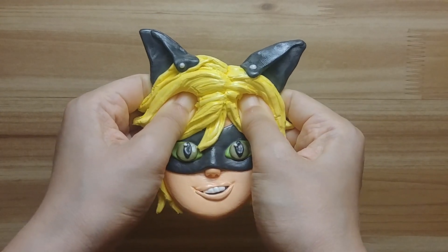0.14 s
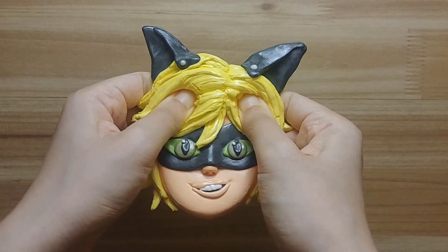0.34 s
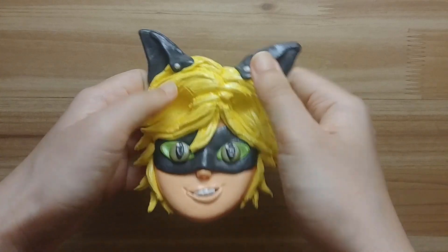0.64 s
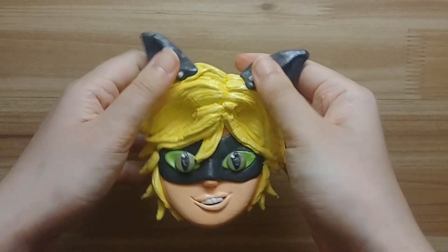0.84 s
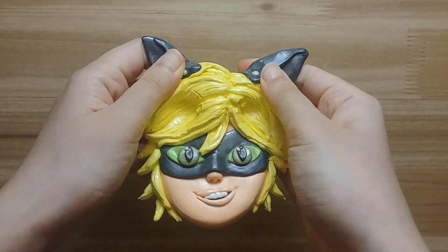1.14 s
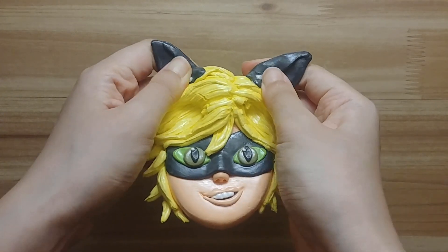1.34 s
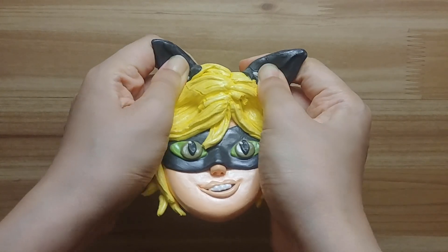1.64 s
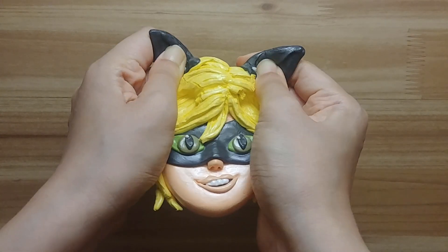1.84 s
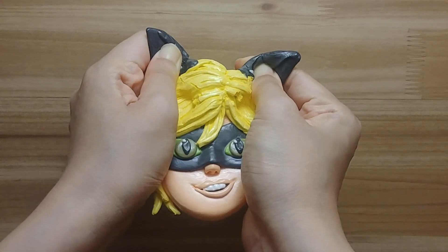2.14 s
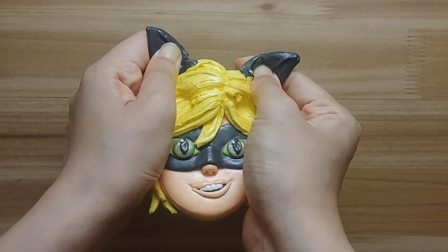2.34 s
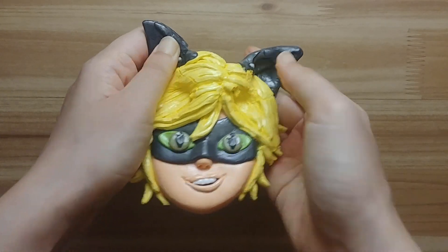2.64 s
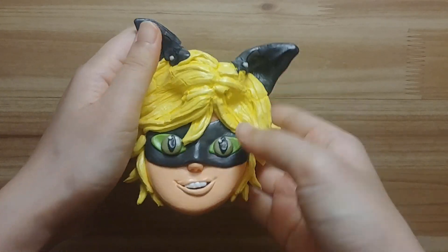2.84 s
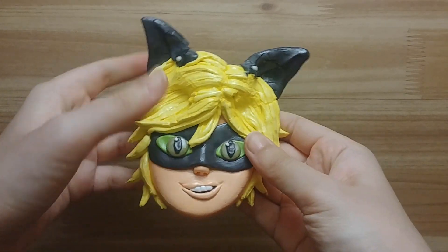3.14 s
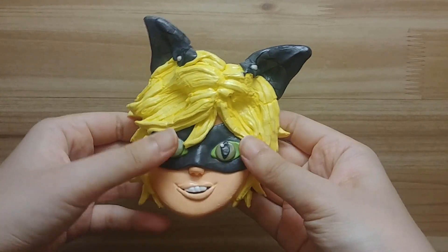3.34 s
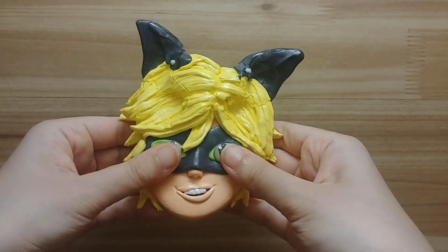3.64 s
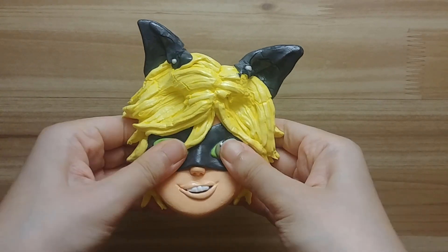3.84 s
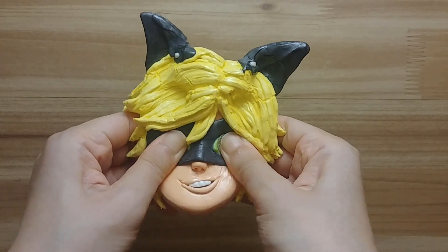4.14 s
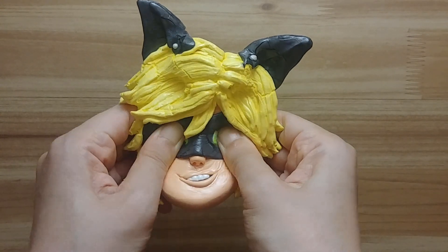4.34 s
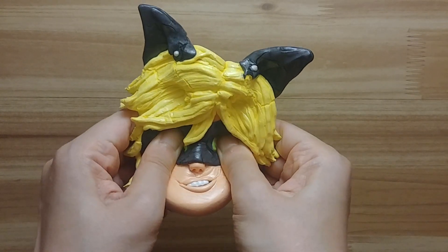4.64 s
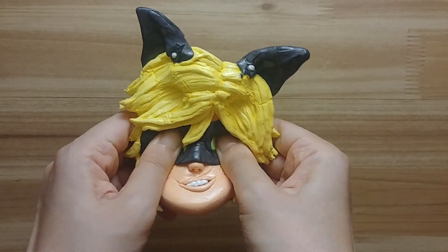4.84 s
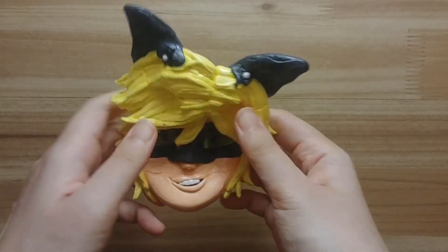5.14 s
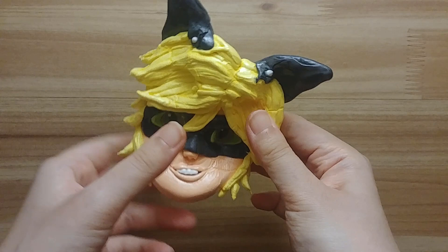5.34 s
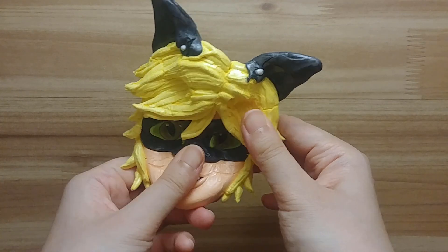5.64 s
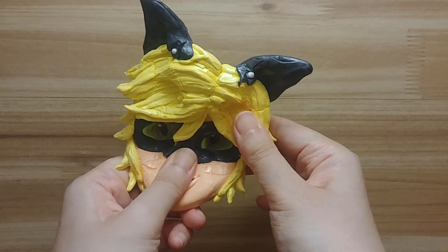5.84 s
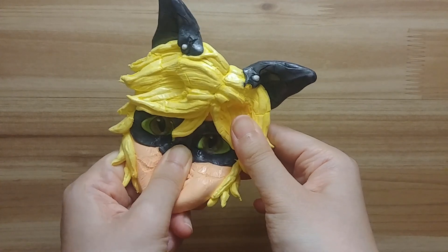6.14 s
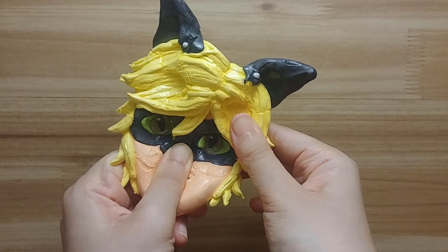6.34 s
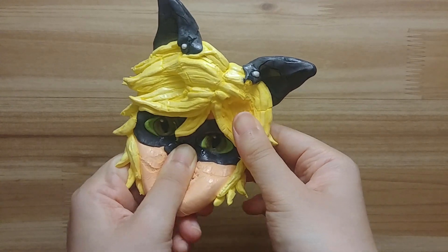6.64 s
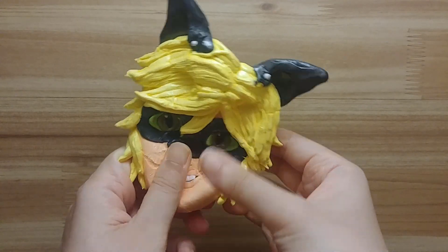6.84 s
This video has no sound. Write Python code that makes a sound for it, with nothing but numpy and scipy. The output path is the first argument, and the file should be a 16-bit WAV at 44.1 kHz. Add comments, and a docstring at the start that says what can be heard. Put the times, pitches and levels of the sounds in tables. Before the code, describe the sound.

Dry, sharp cracks come in five bunches as hands crush the hardened crust of a soft clay figure. The first is light, the middle three are loud and crunchy, and the last is short and softer. Fine crumbs crackle between the snaps, and breaking through adds dull knocks. The sound is close, in stereo and a little to the left, in a small room with faint hiss in the gaps.

```python
"""Sharp, dry cracks come in bunches: thumbs crush the brittle dried shell of a soft clay figure.
Each crack is a spray of tiny fractures that rings the shell and dies away in a small room. Fine
crumbs crackle in between, and a thumb that breaks through gives a dull shove. Two spaced microphones
stand close by. The loudest cracks are clipped; the pauses hold only hiss and a low rumble."""
import sys
import numpy as np
from scipy.fft import rfft, irfft, next_fast_len
from scipy.io import wavfile
from scipy.ndimage import uniform_filter1d

SR = 44100
rng = np.random.default_rng(int(sys.argv[2]) if len(sys.argv) > 2 else 0)


def wrap_up_sound(samples):
    """Save the sound to the file named by the first command line argument, as 16-bit audio."""
    columns = np.atleast_2d(samples).T
    # keep every value between -1 and 1, then stretch to whole-number steps
    tamed = np.clip(columns, -1, 1)
    steps = np.round(tamed * 32767).astype(np.int16)
    wavfile.write(sys.argv[1], SR, steps)


N = 309141
SPAN = 8192  # samples in one crack or shove


def amp(db):
    """Turn decibels into a gain."""
    return 10 ** (np.asarray(db) / 20)


def unit(x):
    """Scale each channel to an average power of 1."""
    return x / np.sqrt(np.mean(x ** 2, axis=-1, keepdims=True) + 1e-20)


def along(points, hz):
    """Join (Hz, value) points into a curve on a log frequency axis."""
    freqs, values = np.transpose(points)
    return np.interp(np.log(hz + 1), np.log(freqs + 1), values)


def filtered(x, response):
    """Turn each frequency of x up or down by response(hz)."""
    size = next_fast_len(N + SPAN)
    return irfft(rfft(x, size) * response(np.fft.rfftfreq(size, 1 / SR)), size)[..., :N]


def ringing(modes, hz):
    """A gain curve with a steep peak at each ringing pitch; white noise keeps its power."""
    power = sum(amp(db) ** 2 / (1 + ((hz * hz - pitch * pitch) / (hz * width + 1)) ** 2) ** 2
                for pitch, width, db in modes)
    return unit(np.sqrt(power))


def spray(count, grain, depth_db):
    """Uneven random gains, smoothed over `grain` points."""
    wobble = unit(uniform_filter1d(rng.standard_normal(count), grain))
    return unit(amp(depth_db * wobble))


# The tone of the hiss and rumble. Each row: frequency in Hz, relative level in dB.
HISS_TONE = [(25, -35.5), (40, -27), (58, -5), (105, -4), (150, -10), (300, -13), (1000, -21.5),
             (5000, -29), (6800, -32.5), (7700, -31), (9000, -37), (11000, -37.5), (15800, -31)]
# How alike left and right are. Each row: frequency in Hz, likeness from 0 to 1.
LIKENESS = [(60, .4), (130, 0.58), (300, 0.014)]

def hiss(level_db=-56.5):
    """Steady microphone hiss and room rumble; the rumble is partly the same on both sides."""
    def tone(hz):
        angle = np.arccos(along(LIKENESS, hz)) / 2
        return amp(along(HISS_TONE, hz)) * [np.cos(angle), np.sin(angle)]
    mid, side = filtered(rng.standard_normal((2, N)), tone)
    return amp(level_db) * unit(np.array([mid + side, mid - side])) * amp([[1.5], [-1.5]])


# Crumbs and cracks share a bright microphone ring near 8 kHz, loose flakes and a fine fizz.
# Each row: pitch in Hz, width in Hz, relative level in dB.
MIC_MODES = [(7823, 1400, 5.5), (6317, 1600, -4.5)]
FLAKE_MODES = [(3140, 870, -5), (4770, 3700, -4)]
FIZZ_MODES = [(11850, 12000, -2), (16700, 9100, -0.5)]
# Crumbs under the thumbs, one list per squeeze. Each point: time in seconds, level in dB.
CRUMB_SWELLS = [
    [(0.0, -46.5), (0.124, -74), (0.348, -65), (0.47, -45), (0.62, -63), (0.674, -57.5), (0.808, -55),
     (0.95, -82.5)],
    [(1.1, -66.5), (1.266, -72.5), (1.398, -28), (1.428, -31.5), (1.496, -26), (1.708, -39.5), (1.776, -31),
     (1.834, -29), (1.956, -70), (2.05, -64)],
    [(3.6, -77), (3.752, -64), (3.8, -53), (3.9, -39), (3.942, -30), (3.992, -32), (4.06, -38),
     (4.11, -26.5), (4.384, -55), (4.522, -69.5), (4.62, -69.5)],
    [(5.58, -83), (5.704, -58), (5.814, -26.5), (5.838, -19), (5.888, -31.5), (5.966, -41.5), (6.12, -41),
     (6.246, -67), (6.366, -67.5), (6.48, -80)],
    [(6.58, -75.5), (6.734, -52.5), (6.788, -61), (6.854, -58), (6.91, -75), (6.972, -70), (7.01, -59.5)],
]

def crumbs():
    """A dense crackle of fractures too small to tell apart, nearer the left microphone."""
    def tone(hz):
        return (ringing(MIC_MODES, hz) + amp(-1) * ringing(FLAKE_MODES, hz)
                + amp(-8.5) * ringing(FIZZ_MODES, hz))
    t = np.arange(N) / SR
    level = sum(amp(np.interp(t, *np.transpose(swell), left=-120, right=-120)) for swell in CRUMB_SWELLS)
    grains = spray(N, grain=110, depth_db=1.5) * rng.standard_normal((2, N))
    return level * unit(filtered(grains, tone)) * amp([[2.5], [-2.5]])


# The dull tone of a shove. Its row: pitch in Hz, width in Hz, relative level in dB.
RATTLE_MODES = [(450, 4500, 2)]
# A thumb breaks through the shell. Each row: start in seconds, level in dB.
SHOVES = [(.4373, -39), (.4754, -40), (.7729, -38.5), (1.301, -36), (1.4975, -42), (1.5264, -36.5),
          (1.5575, -44.5), (1.6536, -37), (1.6688, -35), (1.752, -33.5), (1.8598, -39.5), (3.8818, -40.5),
          (3.938, -30.5), (3.9681, -31), (3.9922, -36.5), (4.0127, -34), (4.0444, -27), (4.071, -33.5),
          (4.1103, -48.5), (4.1698, -40), (4.2282, -41), (5.6883, -27), (5.8081, -29), (5.8527, -31.5),
          (5.99, -38), (6.0317, -25), (6.1118, -41.5), (6.2803, -37.5)]

def shoves(push_s=0.0002, rattle_fade_s=0.084):
    """One short push as the thumb breaks through, and a dull rattle after it."""
    out = np.zeros((2, N + SPAN))
    t, hz = np.arange(SPAN) / SR, np.fft.rfftfreq(SPAN, 1 / SR)
    push = t / push_s * np.exp(1 - t / push_s) * amp([[4.75], [-4.75]])  # louder on the left
    fade = amp(-0.5 - 60 * t / rattle_fade_s)
    for start, db in SHOVES:
        rattle = irfft(rfft(rng.standard_normal((2, SPAN))) * ringing(RATTLE_MODES, hz))
        out[:, round(start * SR):][:, :SPAN] += amp(db) * (push + fade * rattle)
    return out[:, :N]


# Each part of the figure rings in its own way. Each row: pitch in Hz, width in Hz, relative level in dB.
HAIR = [(900, 360, -2), (1570, 1000, 1.5), (3060, 880, 4.5)]
EARS = [(952, 540, -6.5), (1690, 370, 2.5), (2384, 950, 0.5)]
EYES = [(920, 170, 0.5), (1640, 2250, 4.7), (2390, 1600, 4)]
CHIN = [(895, 450, -5.5), (1740, 1300, -3.5), (3030, 890, 1)]
FACE = [(930, 280, -12), (1290, 400, -5.5), (1760, 610, -2.5), (2250, 150, 4.5), (2500, 630, 1)]
# The parts, pressed in turn. Each row: start in seconds, how the part rings, base levels of fizz and
# of flakes in dB next to the crack's level, base flake pitch in Hz.
PARTS = [(0, HAIR, -13.5, -2, 5360), (1, EARS, -7.5, -1.5, 4900), (3, EYES, -12.5, -2, 4270),
         (5, FACE, -11.5, -4.5, 4670), (6.6, CHIN, -18, -5, 4720)]
# The cracks; deeper ones ring the shell more. Each row: start in seconds, level in dB,
# shell level in dB next to that level, seconds to fade by 60 dB.
CRACKS = [(0.0, -26.5, -21, 0.024), (0.049, -32, -27, .054), (0.0663, -18.5, -16.5, 0.027),
          (0.1087, -28, -27, 0.058), (.1705, -46, -12, 0.066), (.2135, -56, -18, 0.032),
          (.29, -18, -16.5, 0.025), (0.3465, -41, -11, 0.11), (0.356, -43, -22, 0.065),
          (0.373, -34, -30, 0.11), (0.3805, -29, -21, 0.38), (0.4096, -13.5, -68, 0.042),
          (0.42, -25.5, -6.5, 0.075), (0.4362, -18, -3, 0.05), (.452, -30, -6, 0.087),
          (0.464, -32, -3, 0.088), (0.4759, -21, -7, 0.072), (.486, -31, 0, 0.052), (0.495, -26, -1, 0.042),
          (0.5786, -45, -9, 0.085), (0.5945, -46.5, -5, 0.18), (0.6697, -47.5, -1, 0.051),
          (0.714, -46.5, -12, 0.23), (.7729, -32, -2.5, 0.043), (0.796, -43, -3.5, 0.07),
          (0.8126, -38, -5.5, 0.048), (1.185, -36.5, -28, 0.054), (1.236, -33, -22, 0.033),
          (1.248, -5, -25.5, 0.028), (1.2603, -19.5, -21, 0.045), (1.2687, -22, -15, 0.037),
          (1.287, -33, -36, 0.038), (1.301, 0.5, -24, 0.031), (1.3155, -6.5, -14, 0.022),
          (1.3436, -10, -33, 0.042), (1.357, -17.5, -20, 0.055), (1.368, -17, -27, 0.13),
          (1.381, -10.5, -21.5, .045), (1.4092, -17, -22, 0.053), (1.4215, -10, -43, 0.031),
          (1.4329, -11, -19.5, 0.032), (1.456, -6, -42, 0.035), (1.4747, -13.5, -22, 0.051),
          (1.483, -7.5, -37, 0.068), (1.4974, -8.5, -16.5, 0.067), (1.5252, -16, -7, 0.027),
          (1.5305, -6, -20, 0.039), (1.5564, 3, -17, 0.035), (1.566, -11.5, -10, 0.054),
          (1.59, -10.5, -29, 0.043), (1.604, -20, -16.5, 0.079), (1.6157, -19.5, -10, 0.11),
          (1.626, -8.5, -18, .057), (1.6369, -7, -19, 0.085), (1.6537, -3, -22, 0.037),
          (1.6692, 0.5, -39, 0.015), (1.694, -21, -16, 0.049), (1.7059, -13.5, -40, 0.056),
          (1.712, -10.5, -27, 0.028), (1.75, -18, -20, 0.042), (1.754, -8.5, -16.5, 0.051),
          (1.7751, -8.5, -14, 0.029), (1.7988, -10.5, -42, 0.038), (1.8316, -6.5, -16, .051),
          (1.8525, -5, -22, 0.032), (1.8597, -7, -13, 0.063), (1.903, -8, -27, 0.032),
          (1.9117, -14, -25, 0.049), (1.9366, -29, -10.5, 0.041), (1.9701, -18.5, -36, .045),
          (3.6954, -45.5, -33, 0.057), (3.7326, -19.5, -8, 0.041), (3.7456, -27, -10, .041),
          (3.7814, -35, -24, 0.022), (3.793, -14.5, -44, .035), (3.801, -16, -14.5, 0.056),
          (3.813, -15, -11, 0.033), (3.8281, -11, -13.5, 0.027), (3.8456, -2, -11, 0.031),
          (3.8687, -16, -12.5, 0.064), (3.8818, -11.5, -13, 0.037), (3.8939, -7.5, -35, 0.047),
          (3.898, -14, -35, 0.031), (3.9081, -21, -9, 0.055), (3.938, -0.5, -9, 0.039),
          (3.9679, -0.5, -6.5, 0.043), (3.993, -3.5, -7.5, 0.048), (4.0134, -6.5, -14, 0.036),
          (4.0401, -5.5, -16.5, 0.092), (4.0445, -5, -11.5, 0.047), (4.071, -8.5, -10, 0.033),
          (4.0895, -20.5, -9.5, 0.04), (4.1095, -6, -11.5, 0.052), (4.1265, -10.5, -12.5, 0.055),
          (4.152, -10, -9, 0.083), (4.1687, -16.5, -11, 0.048), (4.178, -7, -19, 0.041),
          (4.1968, -12, -23, 0.031), (4.202, -13, -3.5, 0.041), (4.2208, -15, -10.5, 0.045),
          (4.2279, -11, -10, 0.026), (4.2516, -20, -3.5, 0.071), (4.2825, -26, -41, 0.051),
          (4.3226, -30.5, -23, 0.036), (4.3551, -9.5, -31.5, 0.036), (4.421, -26.5, -16, 0.077),
          (4.429, -33, -4, 0.063), (4.4382, -22.5, -17, 0.063), (4.462, -14.5, -16.5, 0.046),
          (4.5313, -42, -40, 0.05), (4.5433, -47, -33, 0.035), (4.558, -44.5, -33, .045),
          (5.6338, -36, -20, 0.037), (5.6516, -26, -34, 0.023), (5.6678, -16.5, -18, .042),
          (5.6883, -1.5, -4.5, 0.027), (5.703, -17, -29, .028), (5.722, -19, -14, 0.048),
          (5.731, -14.5, -7.5, .036), (5.7476, -19.5, -10, 0.14), (5.7732, -21, -7.5, 0.14),
          (5.8016, -15.5, -9, 0.029), (5.809, -4.5, -5, 0.031), (5.8331, -14, -6, 0.072),
          (5.8528, -3.5, -2, 0.097), (5.864, -8, -23, 0.025), (5.88, -25, -2.5, 0.12),
          (5.9119, -16.5, -14, .086), (5.9202, -16, -4, 0.011), (5.957, -25.5, -9.5, .097),
          (5.9766, -8, -8.5, 0.06), (5.99, -13.5, -6.5, .045), (6.0158, -24.5, -8, 0.041),
          (6.0312, -6, -8, 0.077), (6.044, -9, -4, 0.06), (6.1115, -9.5, 4, 0.047),
          (6.1394, -18, -3, 0.075), (6.1561, -17, -22, 0.022), (6.17, -26.5, -4, 0.048),
          (6.1903, -13.5, -12, 0.027), (6.2154, -25, -4, 0.04), (6.2505, -21.5, -16, 0.013),
          (6.2619, -11.5, -14, 0.037), (6.2801, -13.5, -11, 0.035), (6.3377, -34.5, -19, .045),
          (6.3675, -33, -17, 0.057), (6.3909, -37, -14.5, 0.039), (6.688, -45, -7.5, 0.041),
          (6.6982, -43.5, 0, 0.12), (6.711, -39, -4.5, .13), (6.73, -40.5, -7, 0.14),
          (6.7494, -35.5, -15, 0.062), (6.7665, -32, -15, 0.12), (6.7775, -38, 0.5, 0.12),
          (6.799, -17, -14, 0.045), (6.805, -15, -7.5, 0.059), (6.869, -50, 7, 0.058),
          (6.9638, -37.5, -8.5, 0.086), (6.9864, -45, 4, .045)]

def cracks(scatter_db=2.5, scatter_hz=360, shared=0.7):
    """Each burst of fractures fizzes and rings the flakes, shell and microphones, with a room echo."""
    out = np.zeros((2, N + SPAN))
    t, hz = np.arange(SPAN) / SR, np.fft.rfftfreq(SPAN, 1 / SR)
    mic_ring, fizz, nearby_flakes = (ringing(modes, hz) for modes in (MIC_MODES, FIZZ_MODES, FLAKE_MODES))
    room = amp(-15.5 - 60 * t / 0.15) * (1 - np.exp(-t / 0.009))
    accent = 1 + 0.7 * np.exp(-t / 0.00096)  # the first fracture is the strongest
    rise = 1 - np.exp(-t / 0.00067)
    for (start, crack_db, shell_db, fade_s), luck in zip(CRACKS, rng.standard_normal((len(CRACKS), 4))):
        _, shell_modes, fizz_db, flake_db, flake_hz = [part for part in PARTS if part[0] <= start][-1]
        fizz_db += scatter_db * luck[0]
        # deeper cracks free larger flakes, which sound louder and lower
        flake_db += 0.24 * shell_db + scatter_db * luck[1]
        flake_hz += -28 * shell_db + scatter_hz * luck[2]
        flake_power = ringing([(flake_hz, 1500, 0)], hz) ** 2 + (amp(-1.5) * nearby_flakes) ** 2
        treble_power = mic_ring ** 2 + (amp(fizz_db) * fizz) ** 2 + amp(flake_db) ** 2 * flake_power
        piece_tone = spray(len(hz), grain=132, depth_db=2.5)  # every piece has pitches of its own
        noise = piece_tone * rfft(rng.standard_normal((5, SPAN)))
        treble = irfft(noise[:2] * np.sqrt(treble_power))  # unrelated at the two microphones
        # most of the shell's ring reaches both microphones, a little apart in time
        delay = np.exp(-2j * np.pi * hz * rng.normal(0, 0.0004) * np.array([[0], [1]]))
        shell_noise = np.sqrt(shared) * delay * noise[4] + np.sqrt(1 - shared) * noise[2:4]
        shell = irfft(shell_noise * amp(shell_db) * ringing(shell_modes, hz))
        burst = accent * amp(-60 * t / fade_s) * spray(SPAN, grain=40, depth_db=2.5)
        left_over_right_db = 6 + 1.5 * luck[3]
        sides = amp(left_over_right_db * np.array([[0.5], [-0.5]]))
        sound = (burst * sides + room) * treble + (burst * sides ** 0.16 + room) * shell
        out[:, round(start * SR):][:, :SPAN] += amp(crack_db) * rise * sound
    return out[:, :N]


# Moments when the crackle stops short. Each row: start in seconds, end in seconds.
HUSHES = [(2.004, 2.1), (4.565, 4.7)]

def scene(dip_hz=10710, dip_width_hz=910, dip_depth=0.63):
    """The crushing, heard through a dip in the microphones' treble, over the hiss."""
    t = np.arange(N) / SR
    hushed = sum((t > start) & (t < end) for start, end in HUSHES)
    gate = uniform_filter1d(1.0 - hushed, size=400)
    clay = (cracks() + shoves() + crumbs()) * gate
    clay = filtered(clay, lambda hz: 1 - dip_depth * np.exp(-((hz - dip_hz) / dip_width_hz) ** 2))
    return clay + hiss()


def record(dry, top_hz=15900, edge_hz=150):
    """The loudest cracks are clipped, and the highest treble is cut."""
    return filtered(np.clip(dry, -1, 1), lambda hz: np.clip((top_hz - hz) / edge_hz + 0.5, 0, 1))


dry = scene()
out = record(dry)
wrap_up_sound(out)
```